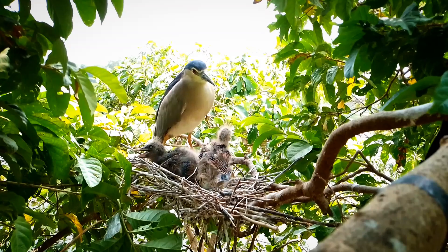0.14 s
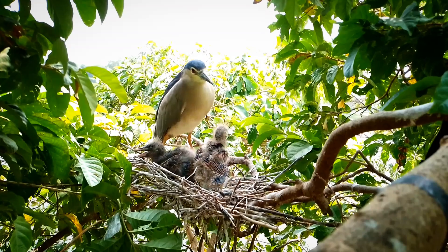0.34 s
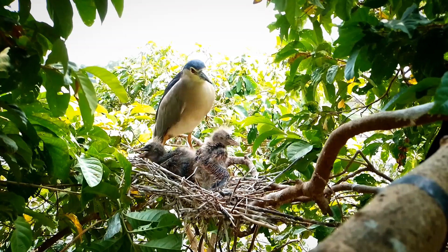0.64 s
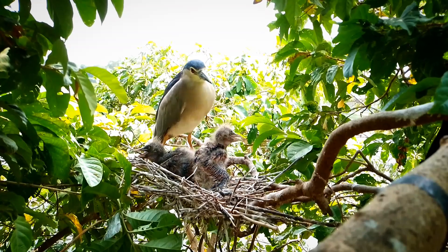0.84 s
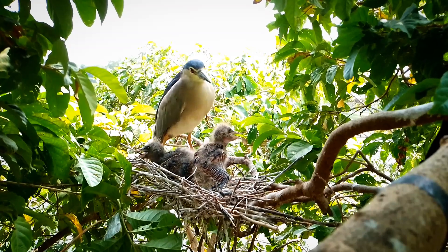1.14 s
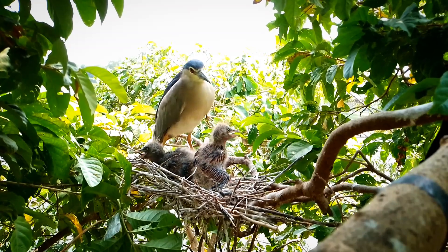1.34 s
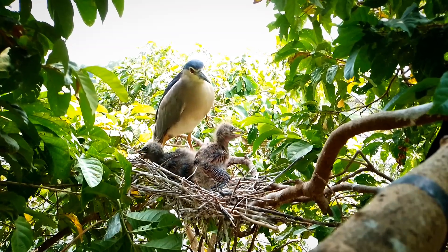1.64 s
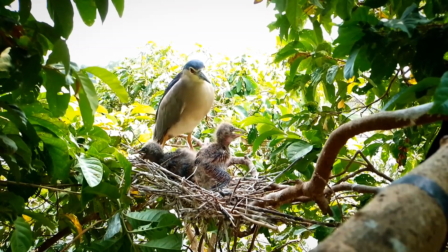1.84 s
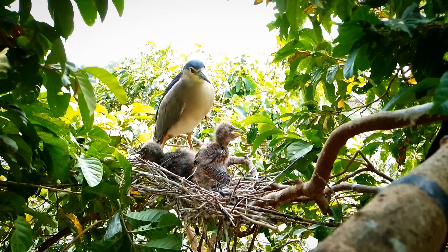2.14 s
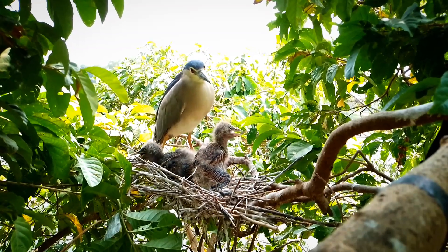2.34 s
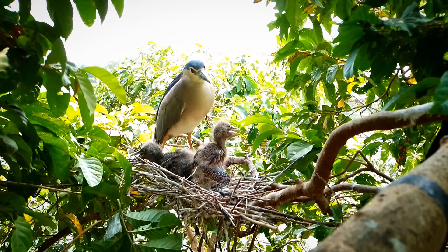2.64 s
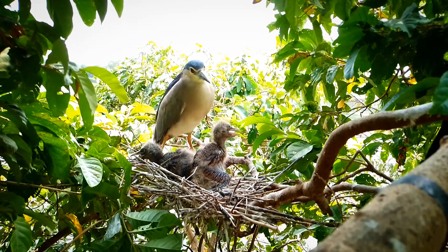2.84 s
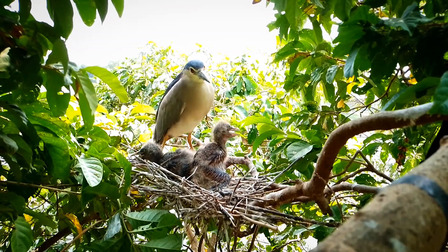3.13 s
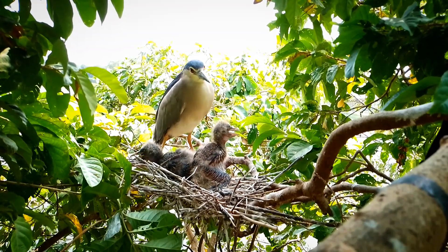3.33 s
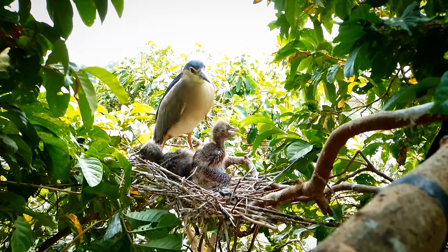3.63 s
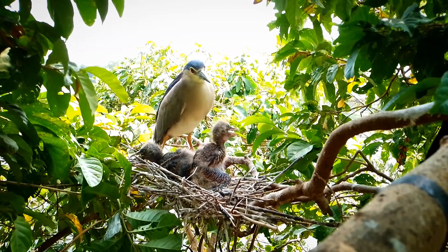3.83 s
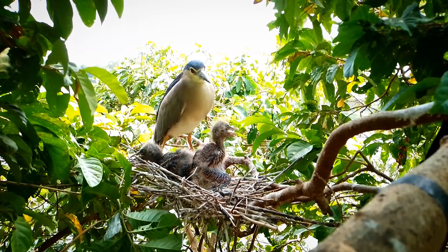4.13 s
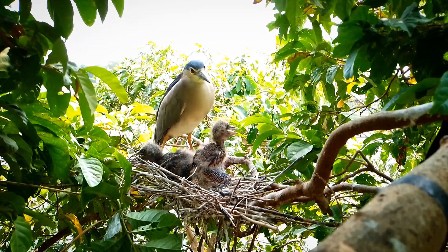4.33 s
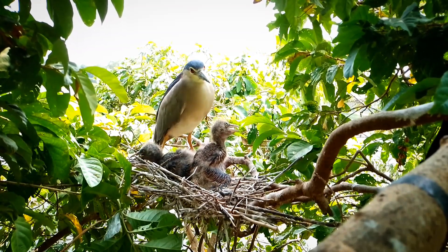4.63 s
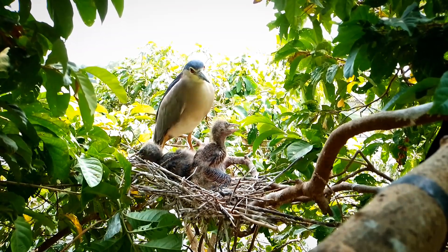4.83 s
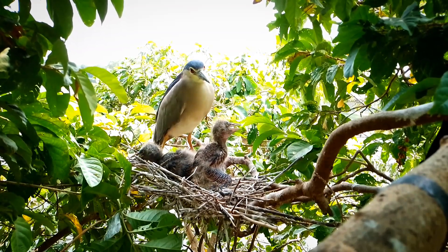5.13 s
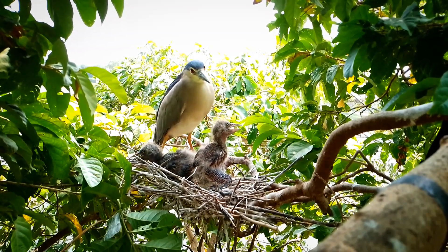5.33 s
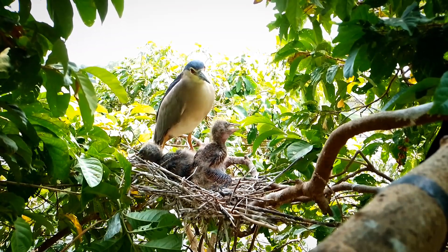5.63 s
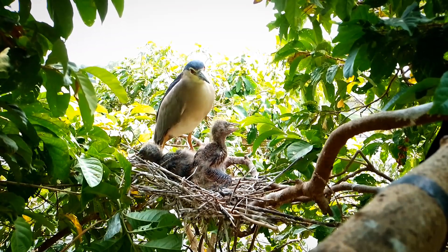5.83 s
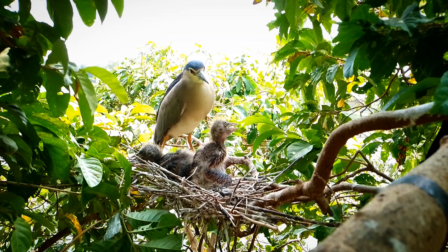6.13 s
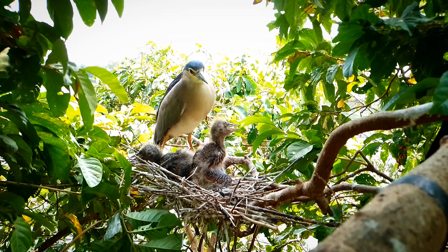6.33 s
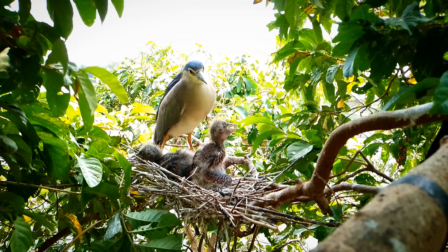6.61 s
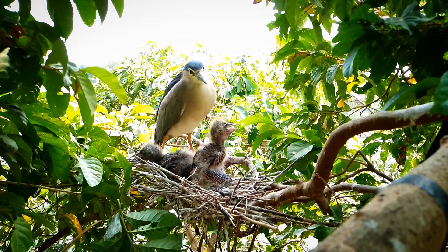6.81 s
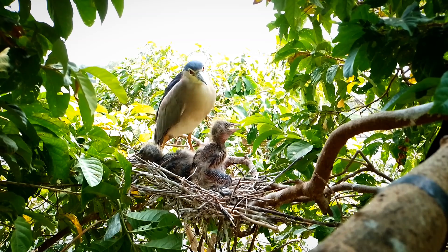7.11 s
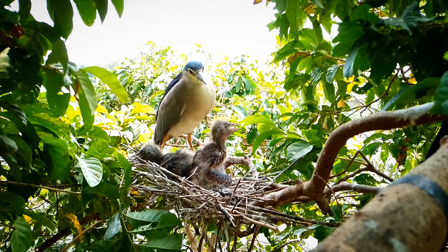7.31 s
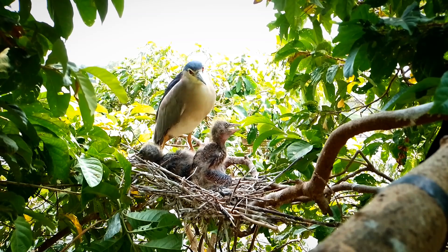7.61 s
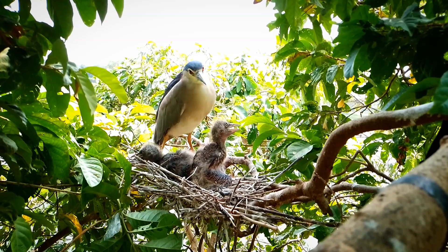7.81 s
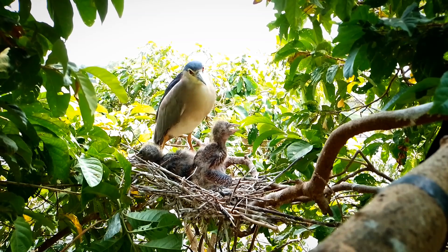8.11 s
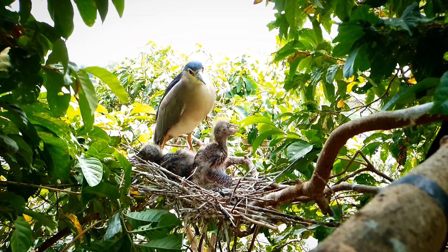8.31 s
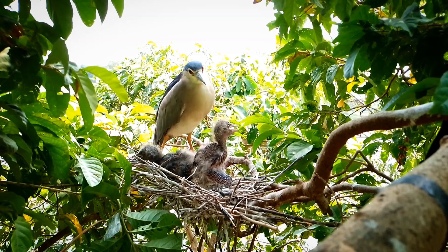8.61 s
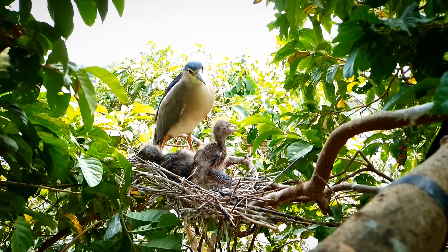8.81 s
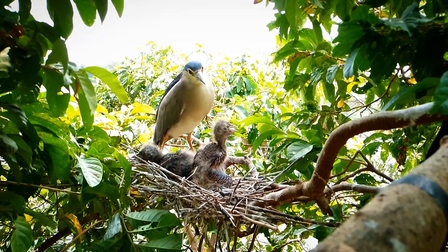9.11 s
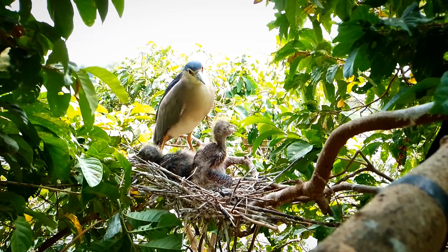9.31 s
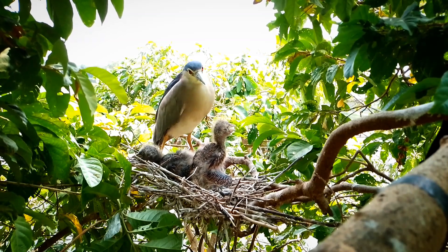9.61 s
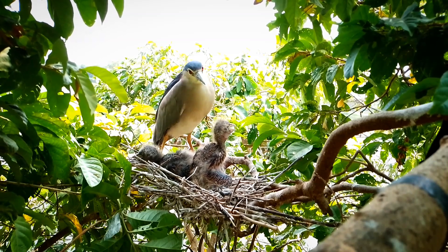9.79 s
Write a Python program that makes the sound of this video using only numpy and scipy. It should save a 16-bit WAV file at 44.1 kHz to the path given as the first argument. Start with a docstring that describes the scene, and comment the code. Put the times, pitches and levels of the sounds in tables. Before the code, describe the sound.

Close stereo view of begging young herons: very short, rough, bright clicking calls, scattered by twigs and leaves. They start sparse and quiet, peak around two to three seconds, pause for one raspy squawk, continue strongly, then come in broken bursts and fade to weak keks. Faint cheeps, low far croaks, distant colony chatter, late rising peeps, a soft canopy wash and quiet outdoor hush surround them.

```python
"""Heron chicks beg in a stick nest in a leafy tree, a few metres away: one gives short raspy keks, about
five a second at its busiest, and a sibling adds thin ticks. Their voices are rough pulses shaped by a throat.
Neighbours cheep, peep and slur; one bark and one hoarse squawk cut in, adults croak far off and more chicks
beg in the distance. Noise bursts from twigs and leaves scatter the calls, the canopy adds a short wash, and
filtered noise makes a faint outdoor hush."""
import sys
import numpy as np
from scipy import signal
from scipy.fft import rfft, irfft, next_fast_len
from scipy.io import wavfile

SR = 44100
rng = np.random.default_rng(int(sys.argv[2]) if len(sys.argv) > 2 else 0)


def to_wav(sig):
    """Store sig (one row per channel, or 1-D mono) as 16-bit WAV at the path in sys.argv[1].

    Samples outside -1..1 are clipped; the rate is SR.
    """
    pcm = np.clip(np.atleast_2d(sig), -1, 1) * 32767
    pcm = np.round(pcm).astype(np.int16)
    wavfile.write(sys.argv[1], SR, pcm.T)  # frames by channels


N = 438794

# throat and beak resonances of a begging chick: pitch_hz [Hz], gain_db [dB]
CHICK_THROAT = [(60, -36), (160, -34.5), (330, -34), (500, -23.5), (720, -20.5), (1150, -25), (1450, -17),
                (1900, -12), (2280, -10.5), (2850, 1.5), (4100, -2), (5600, -0.5), (8000, 3.5),
                (11200, -3.5), (14500, -24)]
# the canopy's wash, band by band: centre_hz [Hz], level_db [dB], time to fall by 60 dB t60_s [s]
CANOPY_BANDS = [(400, -5.5, 0.35), (1233, -22.5, 0.67), (2020, -21.5, 0.36), (2780, -21.5, 0.64),
                (5000, -20, 0.34), (7900, -22, 0.47), (12960, -18.5, 0.48)]


def undb(db):
    """Turn decibels into a gain."""
    return 10 ** (np.asarray(db) / 20)


def unit(x):
    """Scale to an average strength (rms) of 1."""
    return x / np.sqrt(np.mean(x ** 2) + 1e-20)


def along(points, hz, axis=1):
    """Read a column of a (Hz, ..) table on a log-frequency axis."""
    table = np.array(points, float)
    return np.interp(np.log(hz + 1), np.log(table[:, 0]), table[:, axis])


def colour(x, points, axis=1):
    """Make frequencies louder or softer by a (Hz, dB) outline."""
    size = next_fast_len(x.shape[-1] + 512)
    hz = np.arange(size // 2 + 1) * SR / size
    shaped = rfft(x, size) * undb(along(points, hz, axis=axis))
    return irfft(shaped, size)[..., :x.shape[-1]]


def clock(seconds):
    """Sample times from 0, for at least 5 ms."""
    return np.arange(int(max(seconds, .005) * SR)) / SR


def gesture(rows):
    """Start time and sample-by-sample controls of a curve table."""
    s, *columns = np.transpose(rows)
    t = s[0] + clock(s[-1] - s[0])
    return s[0], [np.interp(t, s, column) for column in columns]


def wander(size, rate):
    """Smooth random drift with a spread near 1, given a new target rate times a second."""
    position = np.arange(size) * rate / SR
    targets = rng.standard_normal(size // 8 + 4)
    return np.interp(position, np.arange(len(targets)), targets)


def add(out, start, sound):
    """Mix a stereo sound in at its time."""
    i = max(int(start * SR), 0)
    out[:, i:i + sound.shape[1]] += sound[:, :max(N - i, 0)]


def syrinx(hz, jitter, shimmer_db, rasp, gate=0.59):
    """Uneven pulses of the voice membrane, each followed by a puff of rough air, strongest in the treble."""
    size = len(hz)
    cycles = np.cumsum(hz * (1 + jitter * wander(size, hz.mean()))) / SR
    offset = (cycles - np.round(cycles)) * SR / hz  # samples from the nearest closure
    pulses = np.sinc(offset) * np.exp(-(offset / 4) ** 2)
    puffs = np.exp(-(cycles % 1) / gate) * rng.standard_normal(size)  # gate: fading time in cycles
    puffs = colour(unit(puffs), [(600, -10.5), (1800, -5.0), (4500, 0.5)])
    return (unit(pulses) + rasp * puffs) * undb(shimmer_db * wander(size, hz.mean()))


def twigs(decay_s=0.0043):
    """A fading random burst per side: many tiny reflections that on average favour no frequency."""
    t = clock(.016)
    burst = rng.standard_normal((2, len(t))) * np.exp(-t / decay_s)
    return burst / np.sqrt(np.sum(burst ** 2, axis=1, keepdims=True))


def place(call, pan_db, nest, moved=0.8, lag_s=.00007):
    """Direct sound plus scatter from the nest; most of the scatter changes as the bird moves its head."""
    # how much of the sound's energy arrives via twigs and leaves: pitch_hz [Hz], share [0-1]
    scatter_share = [(500, 0), (1800, 0.39), (3500, 0.39), (8000, 0.98)]
    size = next_fast_len(len(call) + 2048)
    hz = np.arange(size // 2 + 1) * SR / size
    share = np.clip(along(scatter_share, hz), 0, 1)
    direct = np.exp(-2j * np.pi * hz * np.array([[lag_s], [0]]))  # the right microphone hears it first
    scatter = rfft(np.sqrt(1 - moved) * nest + np.sqrt(moved) * twigs(), size)
    paths = np.sqrt(1 - share) * direct + np.sqrt(share) * scatter
    heard = irfft(rfft(call, size) * paths, size)
    # keep the call's own energy on each side before setting left minus right
    heard *= np.sqrt(np.sum(call ** 2) / np.sum(heard ** 2, axis=1, keepdims=True))
    return heard * undb(np.array([[pan_db], [-pan_db]]) / 2)


def chirps(rows, throat, rise, jitter, rasp, gain_db):
    """Simple calls that swell, glide up or down and fade; the throat partly follows the pitch."""
    out = np.zeros((2, N))
    usual_hz = np.median([row[2] for row in rows])
    for start, length, hz, db, pan_db in rows:
        t = clock(length) / length
        source = syrinx(hz * np.exp(rise * (t - .5)), jitter, 1.4, rasp)
        tuned = [(f * (hz / usual_hz) ** 0.78, gain) for f, gain in throat]
        swell = np.interp(t, [0, .35, .7, 1], [0.18, 1, 0.65, 0.044])
        voice = unit(colour(source, tuned)) * swell
        add(out, start, place(voice * undb(db + gain_db), pan_db, twigs()))
    return out


def split(noise, index):
    """The part of a noise that lies around one of the canopy's bands."""
    size = noise.shape[1]
    hz = np.arange(size // 2 + 1) * SR / size
    chosen = [(row[0], j == index) for j, row in enumerate(CANOPY_BANDS)]
    return irfft(rfft(noise) * along(chosen, hz), size)


def canopy(x, near_db=-14, near_s=0.024, delay_s=0.028):
    """Nearby foliage answers within a few hundredths of a second; the trees around ring on more softly."""
    t = clock(.9)
    noise = rng.standard_normal((2, len(t)))
    tail = 0
    for k, (_, db, t60) in enumerate(CANOPY_BANDS):
        even_energy = np.sqrt(2 * np.log(1000) / (t60 * SR))  # evens out long and short tails
        tail = tail + split(noise, k) * undb(db - 60 * t / t60) * even_energy
    early = rng.standard_normal((2, len(t))) * np.exp(-t / near_s) * np.sqrt(2 / (near_s * SR))
    early = colour(early, [(900, 2), (2700, 4.5), (13000, 1)]) * undb(near_db)
    fade_in = np.minimum(t / delay_s, 1)
    return signal.fftconvolve(x, (tail + early) * fade_in, axes=1)[:, :N]


def air():
    """A faint outdoor hush of filtered noise; the two sides are most alike around 330 Hz."""
    # still outdoor air, relative strength: pitch_hz [Hz], level_db [dB per Hz]
    air_colour = [(25, -20), (70, -11), (110, -17), (165, -31), (250, -12.5), (340, -5), (480, -12.5),
                  (800, -12.5), (1300, -16), (2100, -4), (4000, -11), (8000, -2.5), (11500, -12),
                  (14500, -27)]
    hush_db = -69.5
    side = colour(rng.standard_normal(N), [(100, -4.0), (330, -10.0), (900, 7.0), (2500, 0.0)])
    mid = rng.standard_normal(N)
    hush = unit(colour(np.array([mid + side, mid - side]), air_colour))
    return hush * undb(hush_db + 0.45 * wander(N, 15))


def colony(count=90, pan_db=3, gain_db=-1):
    """Far chicks beg at random, blurred by the foliage, while their level swells and ebbs."""
    # the colony's other nests: time_s [s], level_db [dB, before gain_db]
    chatter = [(0, -60.5), (0.899, -73), (1.4, -51), (4.6, -57), (5.5, -60), (5.9, -50), (6.6, -64.5),
               (7.1, -49), (7.801, -64.5), (8.201, -54.5), (9.95, -60)]
    rows = []
    for k, (late, pitch, loud) in enumerate(rng.random((count, 3))):
        rows.append(((k + late) * N / SR / count, .05, 520 + 280 * pitch, 8 * loud, pan_db))
    calls = chirps(rows, CHICK_THROAT, rise=0.1503, jitter=0.0597, rasp=0.88, gain_db=0)
    # the tone of distance
    far = colour(canopy(calls), [(600, -8), (1300, -13), (2500, 2), (3500, -7), (8000, -1.5), (13000, -5.5)])
    level_db = np.interp(np.arange(N) / SR, *np.transpose(chatter))
    return unit(far) * undb(level_db + gain_db)


def neighbours(cheep_pan_db=2.0, peep_pan_db=3.0, slur_pan_db=.6):
    """Three small voices nearby, made of gliding pulses: one cheeps, one peeps, one slurs downward."""
    # cheeps from a neighbouring nest: start_s [s], pitch_hz [Hz], level_db [dB, before the gain below]
    cheep_notes = [(.008, 701, -54), (.21, 692, -50.5), (.968, 700, -56), (1.155, 692, -54.5),
                   (1.34, 700, -53.5), (2.04, 682, -56), (3.148, 618, -50.5), (3.345, 651, -50.5),
                   (3.733, 662, -51), (4.445, 646, -51.5), (5.965, 654, -60), (6.16, 661, -50.5),
                   (6.375, 634, -53), (7.735, 653, -59), (7.914, 670, -57), (8.12, 660, -55),
                   (9.875, 613, -56.5)]
    # a run of thin rising peeps: start_s [s], level_db [dB, before the gain below]
    peep_notes = [(8.158, -56.5), (8.235, -53), (8.513, -45.5), (8.657, -46.5), (8.801, -48.5),
                  (8.855, -53.5), (8.954, -52), (9.074, -61.5), (9.11, -57.5)]
    # faint falling notes: start_s [s], level_db [dB, before the gain below]
    slur_notes = [(1.712, -56), (6.905, -51)]
    # throat and beak resonances of each voice: pitch_hz [Hz], gain_db [dB]; they shift with the note
    cheep_throat = [(350, -28.5), (700, -28.5), (1450, -28.5), (2000, -7), (2300, -26), (2660, 5),
                    (3200, -11), (4500, -11), (6500, -11), (8000, -7.5), (11200, -21), (14500, -28)]
    peep_throat = [(1050, -52), (1500, -32), (2000, 1.5), (2500, -8), (3050, -8), (3550, -15), (4100, 2.5),
                   (5100, -16), (6200, -3), (8300, -9), (11000, -28), (14500, -39)]
    slur_throat = [(1500, -30), (2500, 4), (4000, -23), (12000, -28)]
    cheep_s, slur_s, slur_hz = .04, .052, 2520
    loudest_s, loudest_hz = .045, 1037  # of the loudest peep
    s_per_db, hz_per_db = .0015, 4  # softer peeps are shorter and lower
    cheeps = [(s, cheep_s, hz, db, cheep_pan_db) for s, hz, db in cheep_notes]
    top_db = max(db for _, db in peep_notes)
    peeps = []
    for s, db in peep_notes:
        softer_db = top_db - db
        peeps.append((s, loudest_s - s_per_db * softer_db, loudest_hz - hz_per_db * softer_db, db, peep_pan_db))
    slurs = [(s, slur_s, slur_hz, db, slur_pan_db) for s, db in slur_notes]
    return (chirps(cheeps, cheep_throat, rise=0.08, jitter=.02, rasp=.8, gain_db=5.0)
            + chirps(peeps, peep_throat, rise=0.16, jitter=0.025, rasp=0.6, gain_db=2.5)
            + chirps(slurs, slur_throat, rise=-0.126, jitter=0.02, rasp=.3, gain_db=-3))


def beg(length, hz, db, whistle_hz, body_db, treble_db, rise=0.1303, snap=0.44, beak_db=2.5,
        whistle_db=-15.5, whistle_s=0.017, press=0.35):
    """A begging note: a brief whistle over a short run of rough pulses whose pitch climbs."""
    boost_db = 3  # overall strength of both chicks
    easy_db = -34  # below this level a note is unpressed and keeps more of its fundamental
    # the note swells for a share of its length, sags to a share of its peak, then stops
    attack_share, sustain_share, release_s = .3, 0.34, 0.0097
    t = clock(length + release_s)
    source = syrinx(hz * np.exp(rise * (t / length - .5)), jitter=0.0646, shimmer_db=3.5, rasp=1.0)
    # pressing harder brightens the voice: soft notes keep more fundamental and less octave
    tilt = [(600, press * (easy_db - db)), (1000, body_db - press * max(easy_db - db, 0)),
            (2250, body_db), (2900, 0), (5500, 0), (7500, treble_db)]
    # the beak never opens quite the same way twice, so its upper resonances vary
    beak = [(f, beak_db * rng.standard_normal()) for f in np.linspace(2500, 13000, 24)]
    voice = unit(colour(colour(colour(source, CHICK_THROAT), tilt), beak))
    whistle = np.sin(2 * np.pi * np.cumsum(whistle_hz * (1 + 0.025 * wander(len(t), 406))) / SR)
    whistle *= np.exp(-(t / whistle_s) ** 2)
    voice = voice + whistle * undb(whistle_db + body_db - treble_db / 2)
    attack = length * attack_share
    push = np.interp(t, [attack, length, length + release_s], [1, sustain_share, 0])
    push *= np.minimum(t / attack, 1) ** snap
    return unit(voice * push) * np.sqrt(np.mean(push ** 2)) * undb(db + boost_db)


def begging(nest):
    """Two chicks share the nest and its twigs: one keks in rough pulses, the other ticks in between."""
    # the upright chick's full-throated keks:
    # start_s [s], length_s [s, before the release], pitch_hz [Hz], level_db [dB, before the boost]
    kek_notes = [(0.771, 0.03, 652, -56), (0.999, .033, 676, -48), (1.21, 0.03, 738, -43),
                 (1.525, 0.026, 633.6, -31), (1.76, .02, 754, -32), (1.929, 0.028, 742, -30),
                 (2.111, .028, 772, -27), (2.31, 0.033, 796, -27), (2.479, 0.027, 697, -20.5),
                 (2.666, 0.027, 813.6, -20.5), (2.854, 0.03, 810, -22.5), (3.03, .02, 798, -21.5),
                 (3.197, 0.024, 701, -23), (3.9, 0.04, 542.4, -32), (4.084, 0.041, 671, -25.5),
                 (4.291, .031, 594, -25), (4.501, 0.03, 550, -23), (4.69, 0.027, 521, -22),
                 (4.874, 0.031, 575, -24.5), (5.059, 0.029, 530.6, -26), (5.246, 0.027, 549.3, -29),
                 (5.818, .04, 695, -36.5), (6.099, .026, 624, -27), (6.278, 0.031, 637, -22.5),
                 (6.966, 0.036, 578.3, -28.5), (7.095, .038, 556, -37), (7.192, .029, 814, -23),
                 (7.312, .032, 505, -36.5), (7.525, .033, 500, -38), (7.976, 0.037, 500, -42.5),
                 (8.185, .034, 514, -39), (8.384, .048, 523, -36), (8.606, 0.033, 501.6, -38),
                 (8.696, 0.046, 575, -44.5), (9.138, 0.031, 516, -45), (9.352, 0.036, 548.4, -38.5),
                 (9.562, 0.041, 538, -38.5), (9.77, 0.056, 557, -40)]
    # the upright chick's posture drifts slowly:
    # time_s [s], whistle_hz [Hz], body_db [dB], treble_db [dB], left minus right pan_db [dB]
    posture_curve = [(1.0, 2100, -3, -1, 3.5), (1.6, 1966, -2, 1, 0.5), (2.9, 1980, -1, 2, 0.5),
                     (4.1, 1872, 2, 0, 1.5), (4.7, 1734, -6, 0, 2), (5.25, 1692, -6, -5, 1),
                     (6.1, 2050, 1, 2, 1.5), (7.0, 1950, 0, 1, -0.5), (8.6, 2050, -2, -1, 2.5),
                     (9.6, 2050, 2.5, 1.5, -3)]
    # a sibling's thin, bright ticks in the gaps: start_s [s], length_s [s, before the release],
    # level_db [dB, before the boost], left minus right pan_db [dB]
    tick_notes = [(0.181, .025, -47, 4), (1.441, 0.024, -41.5, 4), (1.972, 0.021, -37, -1),
                  (2.201, .015, -33.5, 1.5), (2.404, 0.02, -31.5, -1), (2.6, 0.019, -29.5, -3),
                  (2.999, 0.029, -39, 0), (3.408, 0.033, -34, 1), (4.35, 0.038, -36.5, 0.5),
                  (4.614, .022, -33, 2), (5.355, 0.024, -34, 2), (5.589, 0.033, -36.5, -5.5),
                  (6.032, .033, -32.5, -0.5), (6.244, 0.037, -31, 2.5), (6.652, .023, -38.5, -3.5),
                  (6.88, .032, -35.5, -1.5), (7.117, .02, -28.5, -5), (7.378, .036, -31, -3.5),
                  (7.611, .023, -31, 1)]
    tick_hz, tick_whistle_hz, tick_body_db, tick_treble_db = 669, 2050, -9, 5.5
    out = np.zeros((2, N))
    times, *posture = np.transpose(posture_curve)
    for start, length, hz, db in kek_notes:
        whistle_hz, body_db, treble_db, pan_db = (np.interp(start, times, column) for column in posture)
        kek = beg(length, hz, db, whistle_hz, body_db, treble_db)
        add(out, start, place(kek, pan_db, nest))
    for start, length, db, pan_db in tick_notes:
        tick = beg(length, tick_hz, db, tick_whistle_hz, tick_body_db, tick_treble_db)
        add(out, start, place(tick, pan_db, nest))
    return out


def bark():
    """A whistle with its octave that cracks into slow, hard pulses; a nearby tree throws it back."""
    # the bark's course: time_s [s], pulse rate_hz [Hz], rasp_db [dB], whistle_hz [Hz], whistle_db [dB]
    bark_curve = [(.343, 241.6, -74, 2057, -57), (.351, 240.2, -37.5, 2030, -29),
                  (.358, 231.3, -26, 2130, -27), (.365, 232.5, -24, 2000, -36.5),
                  (.383, 202, -24, 1920, -44), (.389, 212, -37, 1850, -58)]
    # throat and beak resonances: pitch_hz [Hz], gain_db [dB]
    bark_throat = [(180, -57), (400, -30.5), (950, -38), (1400, -11), (1600, -17.5), (1950, 4.5),
                   (2400, -5.5), (2900, -0.5), (3500, -9), (4200, -8.5), (5500, -12), (8000, -7),
                   (11200, -19), (14500, -38)]
    echo_s, echo_db = .05, -21
    out = np.zeros((2, N))
    start, (rate, rasp_db, hz, whistle_db) = gesture(bark_curve)
    rasp = unit(colour(syrinx(rate, jitter=0.113, shimmer_db=-0.5, rasp=1.0), bark_throat))
    phase = 2 * np.pi * np.cumsum(hz * (1 + 0.023 * wander(len(hz), 494))) / SR
    octave = undb(whistle_db - whistle_db.max())  # the octave grows with drive
    whistle = np.sin(phase) + octave * np.sin(2 * phase)
    call = rasp * undb(rasp_db) + whistle * undb(whistle_db)
    add(out, start, place(call, 1.8, twigs()))
    echo = colour(call, [(2000, -5), (2700, 3), (6000, -2)]) * undb(echo_db)
    add(out, start + echo_s, place(echo, 0, twigs()))
    return out


def croaks():
    """Far adults croak: short rough pulses whose pitch falls."""
    # start_s [s], length_s [s], pitch_hz [Hz], level_db [dB, before gain_db]
    croak_notes = [(0.579, 0.066, 376, -73.5), (1.586, 0.065, 413, -68.5), (3.237, 0.037, 400, -53),
                   (3.341, 0.17, 345, -66), (3.82, 0.098, 309, -71.5), (5.789, 0.057, 521, -57.5),
                   (5.872, 0.04, 370, -60.5), (7.049, 0.074, 355, -69)]
    # throat and beak resonances, which shift with the note: pitch_hz [Hz], gain_db [dB]
    croak_throat = [(300, -27), (750, -2), (1100, 12.5), (1550, 4.5), (2200, -28), (6000, -21)]
    rows = [(*row, 0) for row in croak_notes]
    return chirps(rows, croak_throat, rise=-0.127, jitter=0.044, rasp=0.56, gain_db=-5.5)


def squawk():
    """A hoarse call: steadier pulses below, breaking into very uneven, raspy ones above."""
    # the squawk's course: time_s [s], pitch_hz [Hz], level_db [dB]
    squawk_curve = [(3.534, 466, -67), (3.549, 461, -34.5), (3.57, 419, -32.5), (3.595, 415.4, -32.5),
                    (3.62, 434, -28), (3.655, 451.6, -29), (3.674, 445, -45)]
    # throat and beak resonances: pitch_hz [Hz], gain_db [dB]
    squawk_throat = [(220, -25), (430, -6.5), (620, -15), (900, -7.5), (1100, -6), (1400, -2), (1800, 2),
                     (2300, -8.5), (3000, -2.5), (3700, 0), (4700, 3.5), (6000, 0), (7700, 4.5), (9000, -7),
                     (11500, -6.5), (14500, -40)]
    out = np.zeros((2, N))
    start, (hz, db) = gesture(squawk_curve)
    clean = syrinx(hz, jitter=0.0075, shimmer_db=4.5, rasp=0.25)
    clean = colour(clean, [(1800, -5.0), (2800, -2.5)])
    hoarse = syrinx(hz, jitter=.052, shimmer_db=4.5, rasp=0.4)
    hoarse = colour(hoarse, [(450, -12.0), (1500, 4), (2800, 3.5)])
    voice = unit(colour(clean + hoarse, squawk_throat))
    add(out, start, place(voice * undb(db), 2.1, twigs()))
    return out


def scene():
    """The near nest is mostly direct; the farther a bird, the more canopy is heard."""
    near = begging(twigs()) + squawk() + bark()
    nearby = neighbours()
    far = croaks()
    wash = canopy(near + undb(8.0) * nearby + undb(17) * far)
    return near + nearby + far + wash + colony() + air()


def record(dry):
    """Each microphone has its own treble colour; rumble and the very top are cut."""
    # microphone colour: pitch_hz [Hz], left_db [dB], right_db [dB]
    microphone_colour = [(302, 8, 8), (3240, 1, 3), (4380, 4.5, 3.5), (6370, 0.5, -3.5), (8080, 5, -15.5),
                         (8330, 1, -8), (9390, -7, -6), (11090, -19.5, 7.5), (12980, -7, 3.5),
                         (14900, -15, -17)]
    top_hz = 14300
    heard = np.array([colour(dry[0], microphone_colour, axis=1), colour(dry[1], microphone_colour, axis=2)])
    heard = signal.sosfilt(signal.butter(2, 32, "high", fs=SR, output="sos"), heard)
    return signal.sosfilt(signal.ellip(8, .2, 70, top_hz, fs=SR, output="sos"), heard)


dry = scene()
out = record(dry)
to_wav(out)
```